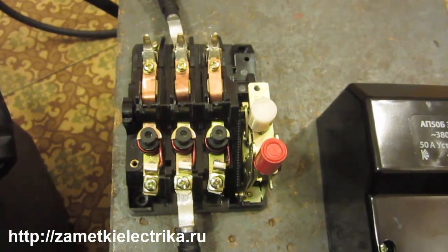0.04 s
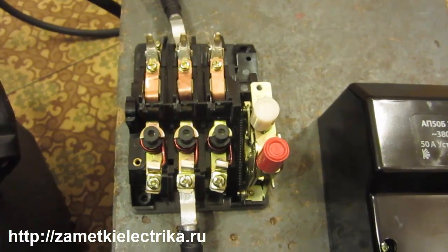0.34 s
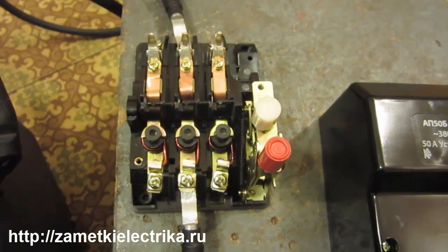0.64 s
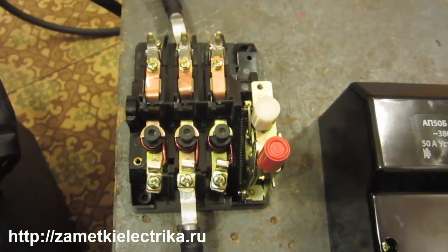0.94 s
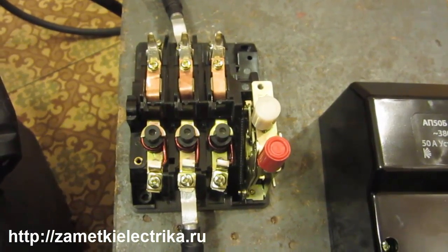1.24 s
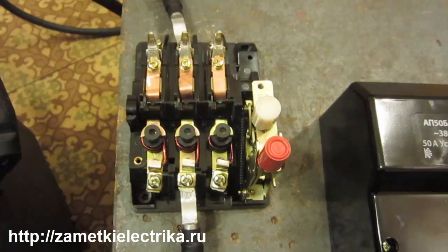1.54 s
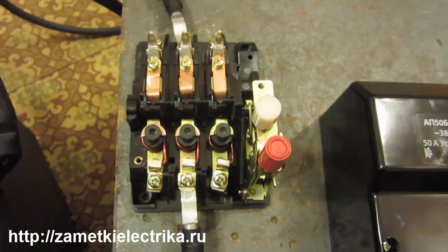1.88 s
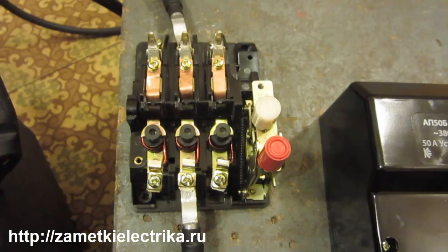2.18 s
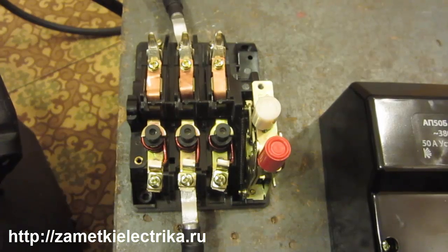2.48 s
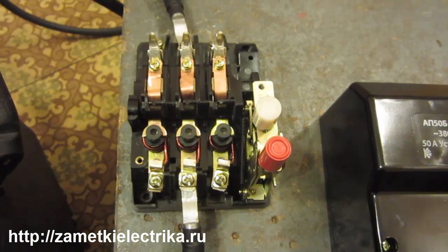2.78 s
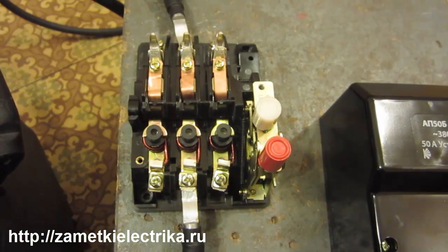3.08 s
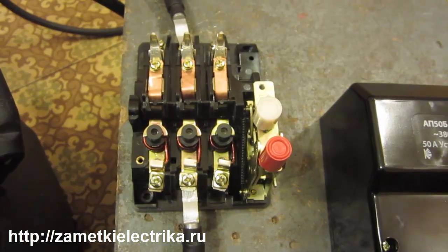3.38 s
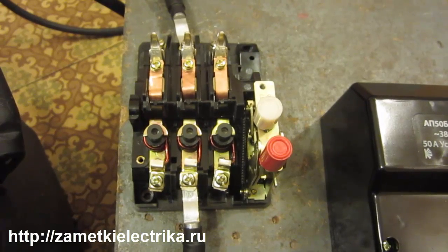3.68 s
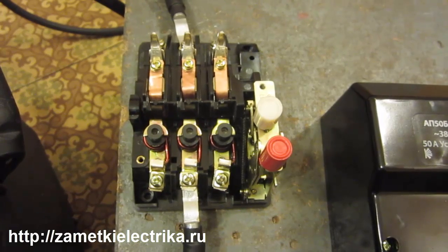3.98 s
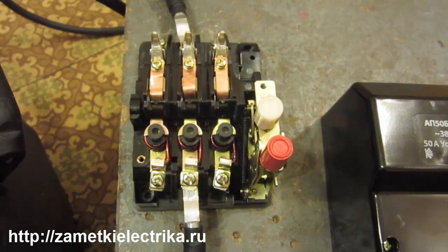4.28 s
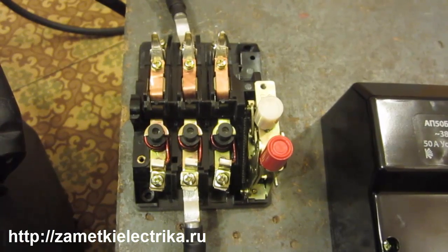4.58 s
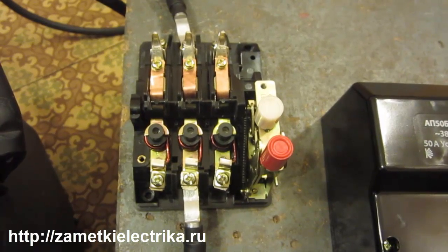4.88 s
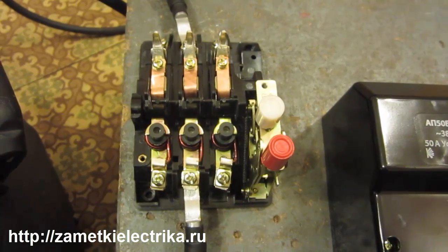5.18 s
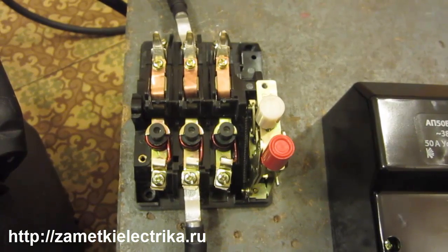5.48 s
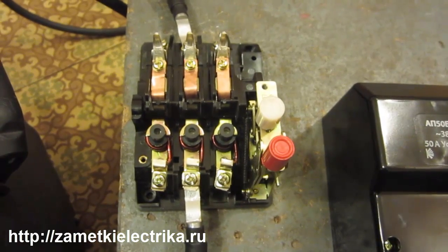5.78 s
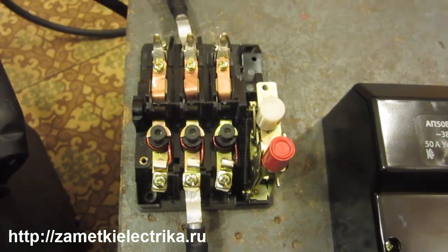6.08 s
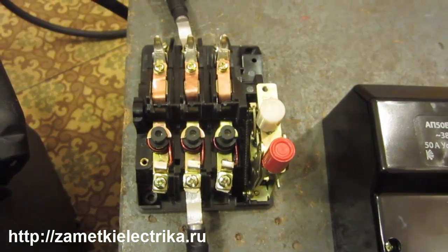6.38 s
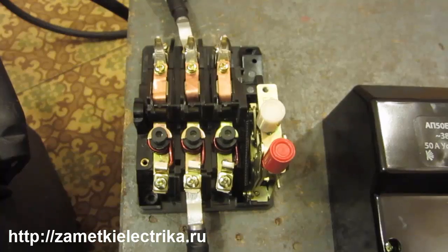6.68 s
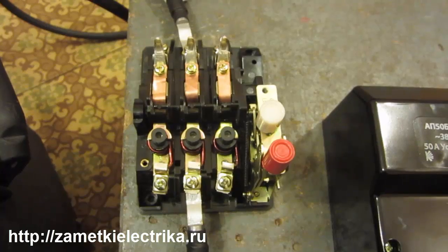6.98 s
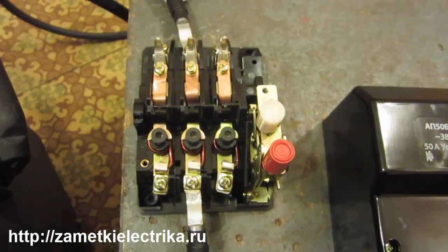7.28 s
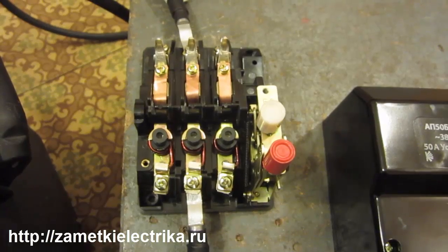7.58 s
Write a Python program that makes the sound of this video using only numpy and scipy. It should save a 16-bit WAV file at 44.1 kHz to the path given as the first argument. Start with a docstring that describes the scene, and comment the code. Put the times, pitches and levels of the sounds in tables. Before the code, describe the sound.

A switch clacks and a circuit breaker buzzes steadily under heavy current, until it trips with a loud snap and the buzz stops.

```python
"""A circuit breaker on a steel bench carries heavy mains current from a test set, in a small room.
Over a low room noise a switch clacks; the current comes on, a transformer hums and the breaker's magnet
armature pulls in. It taps the frame on every half cycle, and the frame's modes ring as a buzz. Near one
second the armature slips into its seat and two soft scrapes follow. The buzz slowly dulls as the
breaker warms, until at 7.7 s it trips with a loud snap and the buzz and hum stop."""
import sys
import numpy as np
from scipy import signal
from scipy.fft import rfft, irfft, next_fast_len
from scipy.io import wavfile

SR = 44100
rng = np.random.default_rng(int(sys.argv[2]) if len(sys.argv) > 2 else 0)


def put_to_file(sound):
    """Save the sound as 16-bit audio at rate SR, in the file named by the first command-line argument."""
    columns = np.atleast_2d(sound).T  # one column per channel
    safe = np.clip(columns, -1, 1)
    whole_steps = np.round(safe * 32767)
    wavfile.write(sys.argv[1], SR, whole_steps.astype(np.int16))


N = 341334
T = np.arange(N) / SR
CURRENT_ON_S, TRIP_S = 0.1119, 7.708
TAP_HZ = 100.013   # twice the mains frequency
FIRST_TICK_REGISTER = 5   # the frame's registers from this one up are heard as ticks


def buzz(uneven_db=-0.01, rattle_db=0.19, tick_rattle_db=-0.1):
    """Modal superposition: the periodic taps drive the damped resonances of frame and bench."""
    # modes of frame and bench: (frequency [Hz], bandwidth [Hz], level [dB])
    modes = [(875.5, 52.4, 10), (824.7, 28, 14), (1195.5, 115.6, 3), (1212.7, 234, 3.5),
             (1566.6, 20.1, 10.5), (1835.4, 33.7, 1.14), (2191, 23, -9), (2680, 300, -3), (2636, 120, 4.5),
             (3172, 83, 3.5), (3490, 400, -10.5), (3998, 64, -13.5), (4210, 110, -14), (4466, 413, -6.5),
             (4476, 143, -8.5), (4842, 149, -1.5), (5307, 181, 3), (5130, 453, -2.2), (5460, 810, -11),
             (6250, 92, -11.5), (7040, 122, -8), (7560, 760, -13), (8170, 335, -9.5), (8110, 150, -9.5),
             (8690, 170, -4), (8910, 1100, -17.5), (10500, 310, -13), (10630, 570, -21), (12100, 550, -22),
             (12550, 280, -21), (13000, 180, -23), (13520, 250, -22.5)]
    # boundaries between registers, or bands of modes: (frequency [Hz])
    register_edges = [850, 2400, 2950, 3700, 5950, 6700, 9500, 11500]
    taps = armature_taps() * from_db(uneven_db * drift(25))
    registers = np.zeros((len(register_edges) + 1, N))
    for k, (hz, width, db) in enumerate(modes):
        # each mode's strength differs a little from tap to tap
        spread_db = np.interp(hz, [1000, 8000], [rattle_db, tick_rattle_db])
        drive = taps * from_db(db + spread_db * drift(40))
        # successive modes swing in opposite directions
        registers[np.searchsorted(register_edges, hz)] += (-1) ** k * resonance(drive, hz, width)
    registers *= from_db(register_levels())
    body = registers[:FIRST_TICK_REGISTER].sum(axis=0)
    ticks = registers[FIRST_TICK_REGISTER:].sum(axis=0)
    # the sharp ticks scatter round the room and fill the gaps between taps
    return body + in_room(ticks, wet_db=-13.0, gap_s=0.0034)


def armature_taps(jitter_s=8e-7, lopsided_db=0.03, lopsided_s=1.2e-6, contact_hz=14200):
    """Magnetic pull peaks each half cycle, giving a pulse train; the two polarities differ slightly."""
    half_cycles = (T - CURRENT_ON_S) * TAP_HZ
    nearest_tap = np.round(half_cycles)
    polarity = np.cos(np.pi * nearest_tap)
    offset_s = (half_cycles - nearest_tap) / TAP_HZ + jitter_s * drift(30) + lopsided_s * polarity
    pulses = np.sinc(offset_s * SR) * np.exp(-(offset_s * SR / 10) ** 2)   # band-limited impulses
    current_on = (half_cycles > -.5) * (T < TRIP_S)
    taps = pulses * from_db(lopsided_db * polarity) * current_on
    contact_lowpass = signal.butter(4, contact_hz, fs=SR, output="sos")
    return signal.sosfilt(contact_lowpass, taps + 1e-18)


def register_levels(weak_start_db=-4.5, pull_s=0.12, bedding_s=2.33, slip_s=0.92, slip_lasts_s=0.03):
    """A softer contact excites high modes less: register levels in dB as it beds in and warms."""
    # drive of each register, from the deepest tone through whine and ring to tick and sizzle:
    # (level [dB], change when freshly closed [dB], change when hot [dB])
    drives = [(0.87, -2.5, 0.1), (0.68, -0.5, 0.1), (0.5, -6, 0), (1.9, -2.5, -4.5), (3, -2.5, -7),
              (-6, 18.5, 7), (0.2, 8.5, -7.5), (-4.5, 15.5, -3), (2, 7, -12)]
    age = np.maximum(T - CURRENT_ON_S, 0)
    pull_db = weak_start_db * np.exp(-age / pull_s)   # the first taps are weak
    unbedded = np.exp(-age / bedding_s)
    warmth = (age / (TRIP_S - CURRENT_ON_S)) ** 2
    levels = np.array([db + pull_db + fresh_db * unbedded + hot_db * warmth
                       for db, fresh_db, hot_db in drives])
    # the armature catches and its ticks dull for a moment
    levels[FIRST_TICK_REGISTER:] -= 2.5 * swell(0.75, width_s=0.24)
    # the deepest tone is held 1 dB down until the armature slips into its seat
    levels[0] -= np.clip((slip_s - T) / slip_lasts_s, 0, 1)
    return levels


def trip(stop_s=7.7111):
    """Release of elastic energy: the spring throws the contacts open and the arm clangs on its stop."""
    # latch slips, contacts fly open, lever rebounds: (time [s], level [dB], t60 [s])
    impacts = [(7.7088, -17, 0.02), (7.7102, -19, 0.02), (7.7111, -0.5, 0.017), (7.7153, -11.5, 0.039),
               (7.7187, -11, 0.032), (7.7224, -14, 0.032), (7.727, -16.5, 0.041)]
    # spectrum of the snap: (frequency [Hz], relative level [dB])
    spectrum = [(40, -31), (120, -19), (250, -14.5), (700, -4), (1000, -6.5), (2100, -8.5), (2700, -12),
                (3300, -3.5), (4000, -2.5), (5000, -6), (5600, -1), (6900, -11), (8300, -11.5),
                (11800, -2.5), (15500, -22)]
    # modes of the arm on its stop: (frequency [Hz], level [dB], t60 [s])
    arm_modes = [(325, -29, 0.042), (705, -17, 0.035), (1530, -9, 0.0068), (3390, -13, 0.064),
                 (5950, 5, 0.006), (11950, -6, 0.012)]
    return clack(impacts, spectrum) + sum(ping(stop_s, hz, db, t60) for hz, db, t60 in arm_modes)


def armature_closing():
    """Impact excitation: the armature pulls in and knocks on the frame, then small parts settle."""
    # impacts of the armature: (time [s], level [dB], t60 [s])
    pull_in = [(0.106, -26, 0.02), (0.1075, -20.5, 0.018)]
    # their spectrum: (frequency [Hz], relative level [dB])
    pull_in_spectrum = [(180, -41), (300, -15), (600, -17), (892, -1), (1490, -22), (3570, 3), (4650, -1),
                        (5390, 1), (6600, -7), (10400, -8), (15500, -33)]
    # impacts of the small parts: (time [s], level [dB], t60 [s])
    settling = [(0.15, -34, 0.023), (0.152, -30, 0.025)]
    # their spectrum: (frequency [Hz], relative level [dB])
    settling_spectrum = [(1000, -22), (2000, -9), (3200, -3), (3850, 3.5), (4300, -20), (9000, -37),
                         (15000, -55)]
    knock = ping(0.109, hz=877, db=-31.5, t60=0.04)
    return clack(pull_in, pull_in_spectrum) + knock + clack(settling, settling_spectrum)


def switch():
    """Direct and reverberant sound: a switch clacks a little way off and the room answers."""
    # impacts of the contacts: (time [s], level [dB], t60 [s])
    contacts = [(0.011, -17.5, 0.045), (0.0128, -6, 0.017)]
    # their spectrum: (frequency [Hz], relative level [dB])
    spectrum = [(120, -55), (200, -34), (858, -22), (1110, -15.5), (2130, -17.5), (2900, -9.5),
                (4000, -12.5), (5110, -13.5), (6100, -2.5), (7500, -9), (8250, 3.5), (9600, -11),
                (12300, -20), (15500, -36)]
    # reverberant tails: (time [s], level [dB], t60 [s])
    tails = [(0.02, -32.5, 0.36), (0.034, -38.5, 0.27)]
    # their spectrum: (frequency [Hz], relative level [dB])
    tail_spectrum = [(200, -20), (600, -8), (1500, -4), (3800, 1.5), (5800, -1), (7300, -7), (9200, 2),
                     (11000, -8), (15000, -24)]
    return clack(contacts, spectrum) + clack(tails, tail_spectrum)


def scrapes(grain_db=4.0):
    """Sliding friction: something slides briefly, twice, catching unevenly."""
    # peaks of the strokes: (time [s], level [dB])
    strokes = [(0.968, -49), (1.048, -56)]
    # friction spectrum: (frequency [Hz], relative level [dB])
    spectrum = [(2000, -40), (3400, -15), (3900, -6), (4300, -8), (4800, -25), (6300, -17), (9000, -45)]
    envelope = sum(from_db(db) * swell(s, width_s=0.036) for s, db in strokes)
    return envelope * from_db(grain_db * drift(80)) * noise(spectrum)


def transformer_hum(fade_s=0.1):
    """Forced vibration: the transformer core hums on harmonics of twice the mains frequency."""
    # core harmonics: (multiple of the tap rate, rms level [dB], start of fade-out [s])
    harmonics = [(1, -49.5, 7.74), (2, -58.5, 7.74), (4, -54.5, 5.2)]
    hum = np.zeros(N)
    for multiple, db, stop_s in harmonics:
        fade = np.clip(1 - (T - stop_s) / fade_s, 0, 1)
        phase = 2 * np.pi * (multiple * TAP_HZ * T + rng.random())
        hum += np.sqrt(2) * from_db(db) * fade * np.sin(phase)
    return hum


def background(waver_hz=2.83, rumble_db=-54.5, rumble_rise_s=0.35, air_db=-49.5):
    """Ambient noise: narrow bands heard as wavering tones, a deep rumble and a dull broadband floor."""
    # drone in the room: (frequency [Hz], level [dB])
    tones = [(120, -59), (174, -58.5), (199, -60.5), (258, -62), (458, -69), (496, -79), (543, -62),
             (577, -60.5), (600, -65), (642, -65.5)]
    # rumble spectrum: (frequency [Hz], relative level [dB])
    rumble_spectrum = [(10, -25), (25, 2), (39, -7), (56, 1), (75, -10), (150, -23), (1000, -70)]
    # room noise spectrum: (frequency [Hz], relative level [dB])
    air_spectrum = [(30, -23), (70, -7.5), (130, -6.5), (250, -7.5), (400, -10), (600, -12), (800, -15.5),
                    (1500, -17.5), (2300, -22), (5000, -23.5), (10000, -33.5), (15500, -46)]
    drone = np.zeros(N)
    for hz, db in tones:
        phase = 2 * np.pi * hz * T
        drone += from_db(db) * (drift(waver_hz) * np.sin(phase) + drift(waver_hz) * np.cos(phase))
    surge_db = 2 * swell(2.5, width_s=0.4)
    fade_in = 1 - np.exp(-T / rumble_rise_s)
    rumble = from_db(rumble_db + surge_db) * fade_in * noise(rumble_spectrum)
    return drone + rumble + from_db(air_db) * noise(air_spectrum)


def clack(onsets, spectrum):
    """Modal overlap: dense, damped modes merge into decaying noise; the bursts add in power."""
    power = sum((from_db(db) * decay(s, t60)) ** 2 for s, db, t60 in onsets)
    return np.sqrt(power) * noise(spectrum)


def ping(start_s, hz, db, t60):
    """Free vibration of one struck mode: a damped sinusoid."""
    return from_db(db) * decay(start_s, t60) * np.sin(2 * np.pi * hz * (T - start_s))


def resonance(x, hz, width_hz):
    """Driven damped oscillator: a two-pole resonance with unit peak gain."""
    radius = np.exp(-np.pi * width_hz / SR)
    numerator = np.array([1, 0, -1]) * (1 - radius ** 2) / 2
    denominator = [1, -2 * radius * np.cos(2 * np.pi * hz / SR), radius ** 2]
    return signal.lfilter(numerator, denominator, x + 1e-18)


def in_room(x, wet_db, gap_s=0.013, t60=0.36):
    """Reverberation: convolution with decaying noise adds the diffuse reflections from the walls."""
    tail = (rng.standard_normal(N) * decay(gap_s, t60))[:SR]
    return x + from_db(wet_db) * signal.fftconvolve(x, tail / np.linalg.norm(tail))[:N]


def noise(spectrum):
    """Spectral shaping: white noise is filtered to the given spectral density and scaled to unit rms."""
    hz, db = np.transpose(spectrum)
    size = next_fast_len(N)
    bins_hz = np.maximum(np.fft.rfftfreq(size, 1 / SR), 1)
    gain = from_db(np.interp(np.log(bins_hz), np.log(hz), db))
    white = rfft(rng.standard_normal(size))
    return rms_one(irfft(white * gain, size)[:N])


def drift(rate_hz, step=40):
    """Random modulation: low-passed noise of unit rms, computed once every step samples."""
    pole = np.exp(-2 * np.pi * rate_hz * step / SR)
    white = rng.standard_normal(N // step + 2002)
    slow = signal.lfilter([1], [1, -2 * pole, pole ** 2], white)[2000:]   # skip the filter's run-in
    return np.interp(np.arange(N) / step, np.arange(len(slow)), rms_one(slow))


def decay(start_s, t60):
    """Exponential damping: an envelope that jumps to 1 and falls 60 dB in t60 seconds."""
    age = T - start_s
    return (age >= 0) * np.exp(-np.log(1000) * np.clip(age / t60, 0, 10))


def swell(peak_s, width_s):
    """Gaussian envelope, 1 at its peak."""
    return np.exp(-((T - peak_s) / width_s) ** 2)


def from_db(db):
    """Level in decibels to amplitude ratio."""
    return 10 ** (np.asarray(db) / 20)


def rms_one(x):
    """Normalisation to unit rms."""
    return x / np.sqrt(np.mean(x ** 2) + 1e-20)


def scene():
    """Superposition: the nearby breaker, the switch, the transformer and the room add in one channel."""
    transients = switch() + in_room(armature_closing() + scrapes() + trip(), wet_db=-14.5)
    return (transients + buzz() + transformer_hum() + background())[None]


def record(dry, cutoff_hz=15900):
    """Overload and band limiting: the loudest snap clips, then a steep low-pass cuts the top."""
    clipped = np.clip(dry, -1, 1)
    return signal.sosfilt(signal.ellip(10, .1, 80, cutoff_hz, fs=SR, output="sos"), clipped)


dry = scene()
out = record(dry)
put_to_file(out)
```